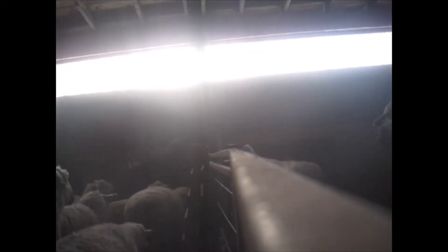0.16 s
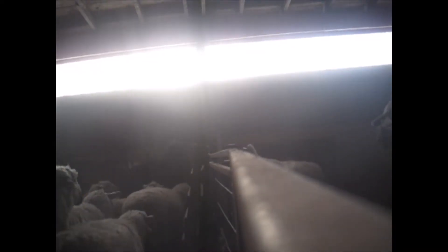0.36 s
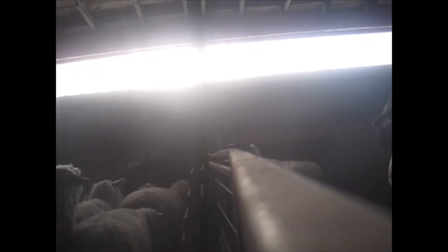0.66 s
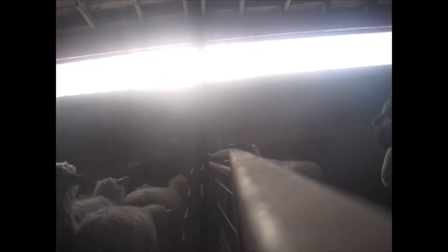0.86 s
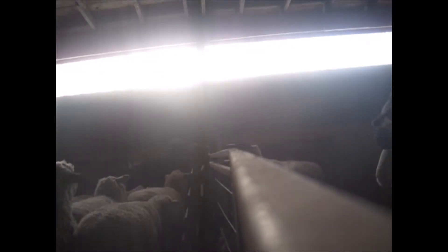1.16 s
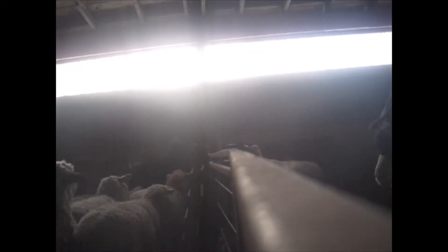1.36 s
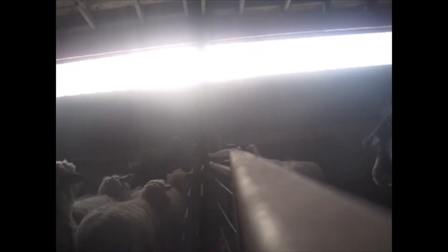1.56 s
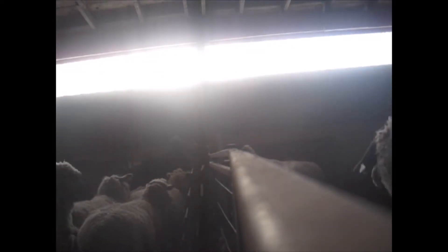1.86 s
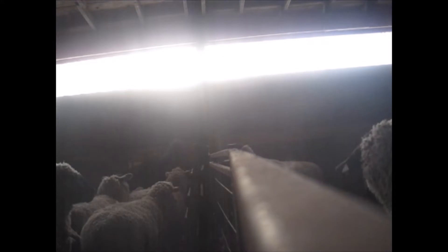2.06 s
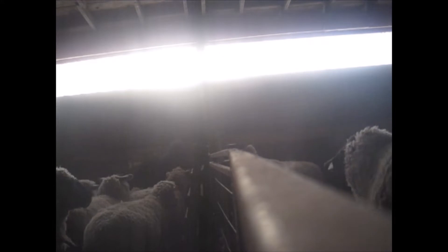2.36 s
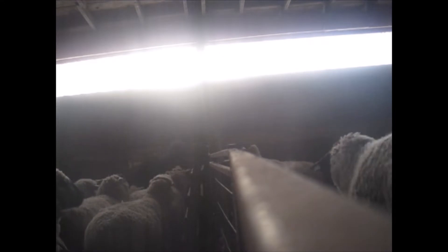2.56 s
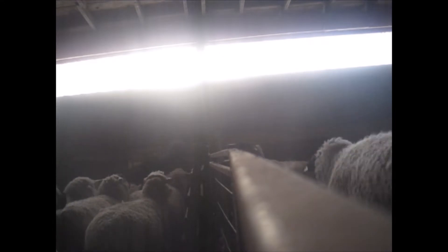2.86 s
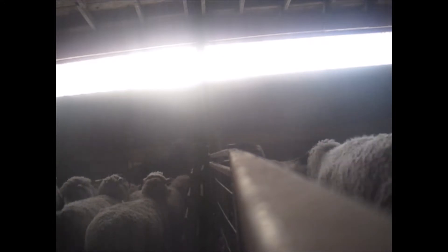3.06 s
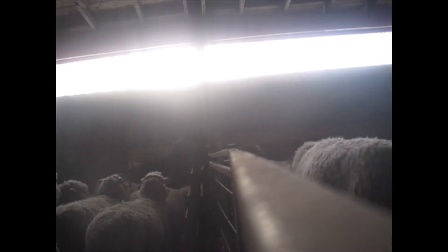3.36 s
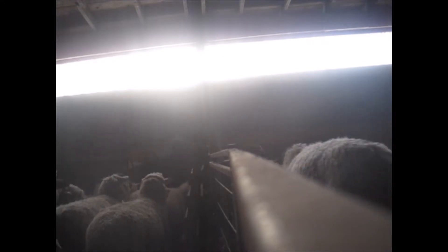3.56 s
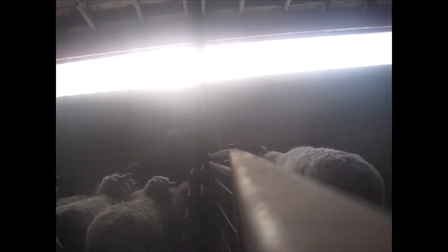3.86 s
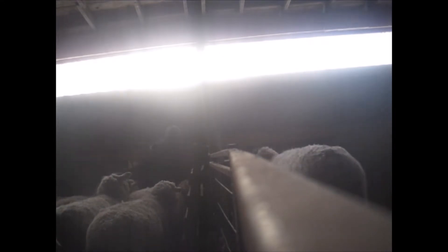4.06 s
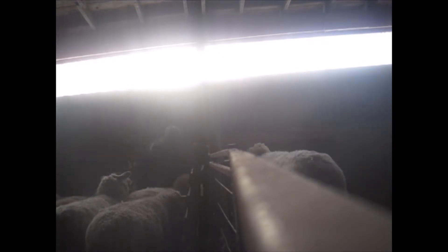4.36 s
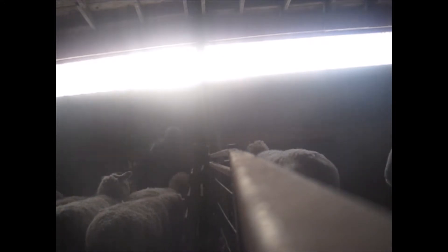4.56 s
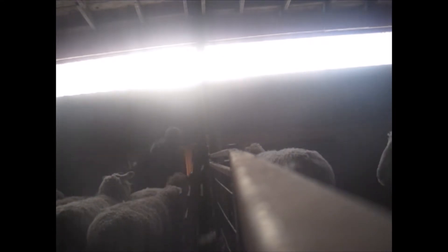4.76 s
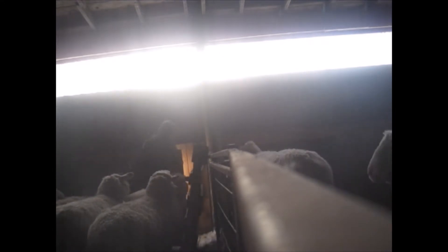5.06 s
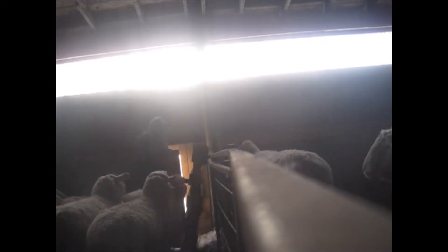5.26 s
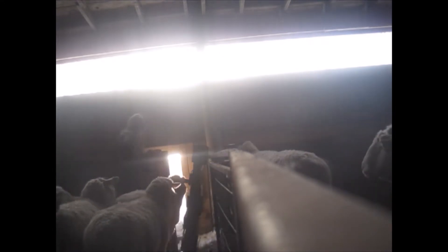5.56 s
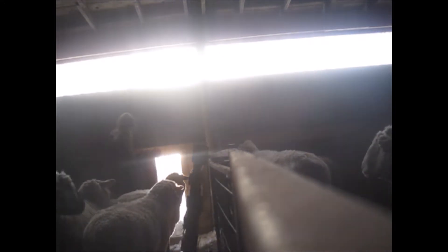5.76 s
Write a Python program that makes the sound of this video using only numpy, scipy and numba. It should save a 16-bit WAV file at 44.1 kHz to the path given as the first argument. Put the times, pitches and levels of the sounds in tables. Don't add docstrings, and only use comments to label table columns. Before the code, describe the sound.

A small camera microphone sits among penned sheep in a briefly echoing barn. A deep call is already ending; short closed-mouth grunts and bird chirps follow. A cough leads into a long, quavering higher bleat with a lower one beneath it. Then the voices stop, leaving thumps on boards, dry rustling and ticks, before a sharp metallic latch strike that rings, is damped, and leaves quiet bumps.

```python
import sys
import numpy as np
from scipy import signal
from scipy.fft import rfft, irfft
from scipy.io import wavfile
from scipy.ndimage import uniform_filter1d
from numba import njit

SR = 44100
rng = np.random.default_rng(int(sys.argv[2]) if len(sys.argv) > 2 else 0)


def wav_record(signal):
    frames = np.transpose(np.atleast_2d(signal))
    bounded = np.clip(frames, -1, 1)
    quanta = np.round(bounded * 32767).astype(np.int16)
    wavfile.write(sys.argv[1], SR, quanta)


def decibels_to_gain(level_db):
    exponent = np.asarray(level_db, float) / 20
    return 10 ** exponent


N = 260631
T = np.arange(N) / SR
LATCH_S = 5.181

# (frequency [Hz], density [dB per Hz])
RUSTLE_COLOUR = [(530, -14), (900, -4), (1040, -7.5), (1370, -2), (1840, -7), (2170, 0.5), (3180, -3),
                 (4230, -4), (12700, -24), (15500, -41)]


def rms_one(x):
    return x / np.sqrt(np.mean(x ** 2) + 1e-20)


def at_hz(points, hz):
    table_hz, values = np.array(points).T
    return np.interp(np.log(hz + 1), np.log(table_hz), values)


def over_time(rows, column):
    table = np.array(rows)
    return np.interp(T, table[:, 0], table[:, column])


def level(rows, column=1):
    s, db = np.array(rows)[:, 0], np.array(rows)[:, column]
    return decibels_to_gain(np.interp(T, np.r_[s[0] - .012, s, s[-1] + .02], np.r_[-90, db, -90]))


def drift(rate):
    r = np.exp(-2 * np.pi * rate / SR)
    return rms_one(signal.lfilter([1], [1, -2 * r, r * r], rng.standard_normal(N + SR))[SR:])


def coloured(x, spectrum):
    return rms_one(irfft(rfft(x) * decibels_to_gain(at_hz(spectrum, np.fft.rfftfreq(N, 1 / SR))), N))


def grains(per_s, spread_db):
    sizes = decibels_to_gain(spread_db * np.minimum(rng.exponential(1, N), 4)) * rng.standard_normal(N)
    return sizes * (rng.random(N) < per_s / SR)


def ring(x, hz, t60):
    r, w = decibels_to_gain(-60 / (t60 * SR)), 2 * np.pi * hz / SR
    return signal.lfilter([0, np.sin(w)], [1, -2 * r * np.cos(w), r * r], x + 1e-18)


@njit
def resonate(x, hz, width):
    y, r = np.zeros(len(x)), np.exp(-np.pi * width / SR)
    for i in range(2, len(x)):
        push = (1 - r * r) / 2 * (x[i] - x[i - 2])
        y[i] = push + 2 * r * np.cos(2 * np.pi * hz[i] / SR) * y[i - 1] - r * r * y[i - 2]
    return y


def glottis(hz, rough, sub, jitter, tremor, shake):
    wobble = np.convolve(shake, np.hanning(2000) / 600, "same")
    sub = np.clip(sub * (1 + .4 * drift(18)), 0, .95)
    unsteady = jitter * rough * drift(70) + tremor * rough * shake + .007 * np.roll(wobble, 30000)
    cycles = np.cumsum(hz * (1 + unsteady)) / SR + .98
    count = np.floor(cycles).astype(int)
    at = np.flatnonzero(np.diff(count)) + 1
    late = (cycles[at] % 1) / (cycles[at] - cycles[at - 1])
    chance = np.clip(rng.standard_normal(N), -2, 1.3)[count[at]]
    size = (1 - sub[at] * (count[at] % 2)) * decibels_to_gain(8 * rough[at] * chance)
    source = np.zeros(N)
    source[at - 1], source[at] = size * late, size * (1 - late)
    return source + .13 * rough * rng.standard_normal(N) * np.exp(-2.5 * (cycles % 1))


def bleat(rows, hoarse, throat, jitter, tremor):
    hz, mouth_hz = over_time(rows, 1), over_time(rows, 3)
    rough, sub = over_time(hoarse, 1), over_time(hoarse, 2)
    shake = drift(30.14)
    source = glottis(hz, rough, sub, jitter, tremor, shake)
    voice, wander, shimmer = 0, drift(4.0), drift(25.2)
    for k, (f_hz, width, db) in enumerate(throat):
        centre = mouth_hz if k == 0 else f_hz * (1 + 0.013 * np.roll(wander, 20000 * k))
        twice = resonate(resonate(source, centre, float(width)), centre, float(width))
        swelling = 2.6 * np.roll(shimmer, 9000 * k)
        voice = voice + decibels_to_gain(db + swelling) * twice
    even = voice / np.sqrt(uniform_filter1d(voice ** 2, size=2600) + 1e-12)
    return level(rows, column=2) * even * decibels_to_gain((.8 + 3 * rough) * shake)


def chest_tone(rows, levels):
    hz = over_time(rows, 1) * (1 + .015 * drift(12))
    return level(levels) * decibels_to_gain(2.5 * drift(23)) * np.sin(2 * np.pi * np.cumsum(hz) / SR)


def ewe():
    # (time [s], pitch [Hz], level [dB], mouth resonance [Hz])
    call = [
        (0.0, 145.1, -14, 650),
        (0.07, 141.9, -16, 630),
        (0.3, 136.4, -14.5, 655),
        (0.35, 135, -13, 676),
        (0.454, 125.6, -16.5, 624),
        (0.495, 124.5, -18.5, 568),
        (0.505, 130, -30, 682),
        (0.6, 127.8, -28, 650),
    ]
    # (time [s], roughness [0-1], strong-weak share [0-1])
    hoarse = [(0, .03, 0), (.13, .04, 0), (.2, .17, .08), (.33, .06, 0), (.45, .12, .05), (.5, .4, .3),
              (.53, .9, .4)]
    throat = [(650, 78, 7.5), (352, 106, -8.5), (1150, 890, -7), (1950, 235, -3.5), (2178, 290, -2),
              (2680, 100, -7), (3300, 480, -15.5), (3870, 660, -13.5), (4400, 100, -14.5), (4866, 150, -12),
              (6240, 280, -26.5), (7500, 750, -31.5), (9400, 220, -33), (10360, 400, -36.5)]
    # (time [s], level [dB])
    chest = [(0.0, -35), (.12, -38.5), (.19, -47)]
    return bleat(call, hoarse, throat, 0.0407, 0.055), chest_tone(call, chest)


def shoving(shoves, peaks_db, swell, drop, after_db, settle):
    gain = 0
    for (s, hold), db in zip(np.array(shoves)[:, :2], peaks_db):
        since = np.maximum(T - s - hold, 0)
        fading = decibels_to_gain(-drop * since) + decibels_to_gain(after_db - settle * since)
        gain = gain + decibels_to_gain(db - swell * np.maximum(s - T, 0)) * fading
    return gain


def jostling():
    # (time [s], hold [s], rustle [dB], boards [dB], rail [dB])
    shoves = [(0.006, 0.048, -60, -60, -41), (0.537, 0.042, -39, -28, -48), (1.085, 0.33, -44, -40.5, -48),
              (1.818, 0.25, -35.5, -37, -48), (2.293, 0.16, -55, -67, -44), (3.116, 0.057, -26, -50, -70),
              (3.19, .01, -30, -14, -67), (3.357, .06, -37, -36.5, -60), (3.287, 0.018, -21.5, -11.5, -30),
              (3.637, 0.058, -60, -44.5, -78), (4.027, 0.092, -39.5, -46, -58), (4.2, 0.033, -38, -50, -50),
              (4.302, 0.009, -35.5, -36, -62), (4.62, 0.055, -17.5, -18, -41), (4.876, 0.33, -38, -39, -91),
              (5.224, 0.11, -26, -63, -76), (5.271, 0.09, -32.5, -33.5, -76),
              (5.769, 0.1, -38.5, -35.5, -57)]
    # (frequency [Hz], density [dB per Hz])
    board_colour = [(59, -71), (100, -27), (192, -1.5), (245, 0.5), (376, 1.5), (934, -0.5), (2360, -24),
                    (3000, -18), (3900, -58), (6600, -120)]
    rustle = coloured(grains(12000, 0.8) * decibels_to_gain(2.4 * drift(25)), RUSTLE_COLOUR)
    boards = coloured(grains(2500, 0.97) * decibels_to_gain(0.32 * drift(8.2)), board_colour)
    rail_band = signal.butter(2, [35, 150], "band", fs=SR, output="sos")
    rail = rms_one(signal.sosfilt(rail_band, rng.standard_normal(N)))
    rustle_db, boards_db, rail_db = np.transpose(shoves)[2:]
    out = shoving(shoves, rustle_db, swell=685, drop=356, after_db=-22.5, settle=34) * rustle
    out += shoving(shoves, boards_db, swell=608, drop=279, after_db=-15.5, settle=58.5) * boards
    return out + shoving(shoves, rail_db, swell=188, drop=81, after_db=-21, settle=9) * rail


def sparrows():
    # (time [s], length [s], start [Hz], end [Hz], level [dB])
    rising = [(0.713, 0.0215, 3174, 4360, -19.5), (0.775, 0.027, 3070, 4180, -16),
              (0.782, 0.068, 5200, 6130, -29.5), (1.329, 0.037, 3200, 3916, -19.5),
              (1.724, 0.068, 2812, 4260, -16.5), (3.126, 0.041, 2910, 5638, -26.5),
              (3.574, 0.039, 2190, 3110, -27), (3.701, 0.048, 2400, 3010, -30.5),
              (3.904, 0.037, 2400, 3130, -35.5), (4.0, 0.05, 3900, 4900, -25.5),
              (4.009, 0.045, 2600, 3687, -21.5), (4.272, 0.031, 3770, 4270, -31)]
    falling = [(3.42, .055, 5100, 4100, -26), (4.05, .05, 5420, 2200, -26), (1.3, .05, 5100, 4800, -27),
               (0.549, 0.04, 4260, 3330, -27.5), (0.742, 0.027, 4000, 2840, -24.5),
               (0.801, 0.034, 3300, 2680, -23), (0.844, 0.051, 6000, 4706, -24.5),
               (.9, 0.038, 6020, 4750, -31.5), (1.041, 0.036, 2540, 2260, -33.5),
               (1.235, 0.035, 4420, 3340, -28), (1.262, 0.055, 3160, 2294, -25.5),
               (2.465, .04, 3600, 3050, -29), (1.426, 0.044, 3890, 2766, -18),
               (1.605, 0.04, 4300, 2600, -27.5), (1.633, 0.053, 4270, 3500, -26),
               (1.651, 0.046, 3300, 2600, -24.5), (2.027, 0.066, 5614, 3830, -20),
               (2.09, 0.043, 4280, 3660, -23.5), (3.193, 0.041, 4730, 3603, -11),
               (3.252, 0.062, 4500, 2960, -21), (3.428, 0.075, 3794, 2605, -24),
               (3.53, 0.024, 4430, 2940, -21.5), (3.667, 0.03, 4500, 2770, -24.5),
               (3.47, .04, 3700, 2600, -31), (4.034, 0.049, 4730, 3400, -19),
               (4.076, 0.042, 3930, 2780, -18), (4.861, 0.063, 3030, 2112, -32.5)]
    hums = [
        (0.501, 0.076, 255, 246, -32.5),
        (2.002, 0.068, 152, 158, -36),
        (2.096, 0.052, 162, 266, -22),
        (3.199, 0.1125, 950, 1100, -19),
        (3.34, 0.045, 1070, 1058, -30),
    ]
    # (time [s], length [s], top [Hz], level [dB])
    arched = [
        (1.008, 0.056, 4760, -34.5),
        (3.201, 0.037, 2250, -18.5),
        (3.43, 0.0613, 1810, -29),
        (3.984, 0.05, 6490, -36),
        (4.293, 0.057, 2943, -31),
    ]
    # (time [s], length [s], pitch [Hz], level [dB])
    steady = [(0.454, 0.038, 2780, -19.5), (0.468, 0.036, 5500, -23.5), (0.737, 0.037, 4400, -20),
              (1.578, 0.059, 5900, -46), (1.644, 0.022, 6300, -38), (1.677, 0.037, 4650, -22),
              (1.68, 0.036, 5040, -34), (2.394, 0.034, 4130, -28.5), (2.417, 0.016, 3700, -26),
              (2.515, 0.023, 3450, -43), (2.511, 0.021, 5300, -40), (2.621, 0.048, 3430, -32),
              (2.638, 0.022, 3870, -41), (2.735, 0.043, 5420, -35), (2.798, 0.037, 3700, -37),
              (2.785, 0.058, 4300, -36), (2.827, .04, 5300, -39.5), (3.163, 0.026, 5500, -20),
              (3.503, 0.037, 4490, -27.5), (3.64, 0.039, 4460, -28.5), (3.598, 0.027, 2940, -28.5),
              (3.739, 0.031, 2990, -40), (4.303, 0.045, 1400, -35), (5.24, 0.025, 3750, -29),
              (5.45, 0.025, 4950, -58)]
    rise_bend, fall_bend = 1.05, 0.93
    arch_ends, octave = 0.91, .05
    flutter = decibels_to_gain(3.13 * drift(500) + 3.7 * drift(70)) + 0.15 * drift(2500)
    burr = .011 * np.sin(2 * np.pi * 110 * T + 3 * drift(20))
    waver = 1 + .016 * drift(90) + .016 * drift(500) + burr
    notes = [(s, d, a, rise_bend * np.sqrt(a * b), b, db) for s, d, a, b, db in rising + hums]
    notes += [(s, d, a, fall_bend * np.sqrt(a * b), b, db) for s, d, a, b, db in falling]
    notes += [(s, d, arch_ends * top, top, arch_ends * top, db) for s, d, top, db in arched]
    notes += [(s, d, 1.015 * hz, 1.01 * hz, .97 * hz, db) for s, d, hz, db in steady]
    out = np.zeros(N)
    for s, length, start_hz, turn_hz, end_hz, db in notes:
        i, n = int((s - .006) * SR), int(length * SR)
        u = np.arange(n) / n
        hz = np.interp(u, [0, .5, 1], [start_hz, turn_hz, end_hz]) * waver[i:i + n]
        phase = 2 * np.pi * np.cumsum(hz) / SR
        swell = np.sin(np.pi * u) ** .55
        whistle = np.sin(phase) + octave * np.sin(2 * phase)
        out[i:i + n] += decibels_to_gain(db + 2.5) * swell * flutter[i:i + n] * whistle
    return out


def blows():
    # (time [s], peak [dB], mode [Hz])
    knocks = [(0.555, -14, 600), (0.606, -14, 794), (0.972, -17.5, 864), (0.974, -17.5, 475),
              (1.287, -11.5, 600), (3.184, -6, 650), (3.273, -26, 1042), (3.642, -22, 430),
              (4.641, -23, 384), (4.297, -40, 700), (4.345, -33, 293), (5.649, -35, 846), (5.769, -24, 980),
              (5.785, -22.5, 1164)]
    # (time [s], peak [dB])
    ticks = [(.974, -24), (1.829, -21), (1.846, -25), (2.402, -21), (3.281, -9), (3.3027, -5.5),
             (3.308, -10), (3.312, -11.5), (3.318, -30), (3.589, -16.5), (3.595, -18.5), (3.694, -13),
             (3.725, -12.5), (4.343, -11), (4.5841, -7.5), (4.609, -10.5), (4.616, -8.5), (4.6417, -5.5),
             (4.647, -15), (4.675, -4.5), (4.866, -18.5), (4.9235, -18), (5.101, -17), (5.118, -19),
             (5.136, -35), (5.179, 2.5), (5.2993, -5.5), (5.306, -9), (5.3392, -13), (5.3464, -12),
             (5.7666, -21)]
    tick_t60_s = 0.041
    out, crack = np.zeros(N), coloured(rng.standard_normal(N), RUSTLE_COLOUR)
    for s, db, hz in knocks:
        i, push = int((s - .003) * SR), np.zeros(5000)
        push[:700] = np.hanning(700) * np.sin(2 * np.pi * hz * T[:700]) / 175
        board = ring(push, hz, 0.035) + .6 * ring(push, 1.27 * hz, 0.05) + .5 * ring(push, 0.74 * hz, 0.06)
        out[i:i + 5000] += decibels_to_gain(db + 4.5) * board
    for s, db in ticks:
        age = np.maximum(T - s + 0.0013, 0)
        attack = np.minimum(age / 0.0026, 1) ** 1.56
        out += decibels_to_gain(db - 11.0) * crack * attack * decibels_to_gain(-60 * np.maximum(age - .003, 0) / tick_t60_s)
    return out


def grunts():
    # (time [s], hold [s], pitch [Hz], peak [dB])
    pushes = [
        (0.981, 0.0044, 217, -23),
        (1.064, 0.012, 233.3, -20.5),
        (1.108, 0.0096, 236, -15),
        (1.33, 0.0064, 236.4, -12.5),
        (1.355, 0.03, 239.9, -12.5),
        (1.432, 0.027, 245.6, -22.5),
    ]
    # (time [s], roughness [0-1], strong-weak share [0-1])
    hoarse = [(.95, .3, .1), (1.06, .12, 0), (1.1, .55, .2), (1.3, .4, .15), (1.36, .25, .1),
              (1.42, .3, .1), (1.5, .4, .1)]
    throat = [(650, 170, 7), (281, 54, 1.5), (463, 130, -1.5), (950, 300, -3.5), (1430, 360, -5.5),
              (2400, 270, -5), (3300, 640, -9.5), (4540, 490, -17)]
    attack_s, release_s, rise, mouth_hz = 0.025, 0.033, 1.02, 578
    out = 0
    for s, hold, hz, db in pushes:
        rows = [(s - attack_s, hz, db - 11, mouth_hz), (s, hz, db, mouth_hz),
                (s + hold, hz * rise, db - 4.0, mouth_hz),
                (s + hold + release_s, hz * rise, db - 24.0, mouth_hz)]
        out = out + bleat(rows, hoarse, throat, 0.071, 0.0564)
    return out


def cough():
    # (time [s], pitch [Hz], level [dB], mouth resonance [Hz])
    call = [
        (1.832, 220, -23, 650),
        (1.846, 219, -17, 650),
        (1.885, 214, -16, 650),
        (1.925, 210, -17, 656),
        (1.945, 210, -27, 650),
        (2.1, 190, -27, 650),
        (2.15, 178, -21, 650),
    ]
    # (time [s], roughness [0-1], strong-weak share [0-1])
    hoarse = [(1.82, .6, .3), (2.14, .7, .3)]
    throat = [(700, 500, 7.5), (416, 360, -2.5), (1100, 1200, 1.5), (1910, 340, -3), (2600, 100, 3.5),
              (3300, 320, 2), (5200, 440, -28)]
    return bleat(call, hoarse, throat, .16, 0.052)


def ram():
    # (time [s], pitch [Hz], level [dB], mouth resonance [Hz])
    call = [
        (2.15, 214.4, -17, 660),
        (2.28, 212.3, -17, 720),
        (2.45, 203, -16.5, 674),
        (2.62, 221.8, -14.5, 700),
        (2.69, 221.6, -18, 843.6),
        (2.76, 218.3, -17, 680),
        (2.84, 214, -17, 720),
        (2.93, 198, -17.5, 740),
        (3.05, 178, -20.5, 700),
        (3.2, 165, -22.5, 652),
    ]
    # (time [s], roughness [0-1], strong-weak share [0-1])
    hoarse = [(2.14, .35, .2), (2.3, .36, .5), (2.5, .45, .6), (2.58, .3, .4), (2.63, .07, .05),
              (2.76, .08, .1), (2.84, .12, .15), (2.92, .22, .3), (3.05, .36, .6), (3.2, .4, .6)]
    throat = [(720, 164, 4.5), (411, 110, -7), (1110, 160, -7), (1493, 310, -0.5), (2143, 386, -2.5),
              (2694, 41, -5.5), (3500, 1500, -44), (5160, 490, -23.5), (7500, 750, -39)]
    # (time [s], level [dB])
    chest = [(2.24, -48), (2.321, -39.5), (2.6, -34), (2.78, -33), (2.89, -42), (2.94, -34), (3.02, -52)]
    return bleat(call, hoarse, throat, 0.0467, .08), chest_tone(call, chest)


def wether():
    # (time [s], pitch [Hz], level [dB], mouth resonance [Hz])
    call = [(2.155, 158.8, -11.5, 700), (2.2, 160.3, -14.5, 700), (2.27, 166.3, -21, 663),
            (2.33, 153.9, -19, 776), (2.42, 153, -19, 786), (2.5, 146.3, -26.5, 700), (2.6, 147, -24, 700),
            (2.69, 147.8, -23, 710), (2.74, 150.3, -17.5, 740), (2.88, 152.9, -18.5, 748),
            (2.98, 151.6, -20, 756), (3.04, 139.3, -15, 700), (3.12, 134.9, -17.5, 683),
            (3.17, 129.8, -27.5, 644)]
    # (time [s], roughness [0-1], strong-weak share [0-1])
    hoarse = [(2.13, .12, .05), (2.27, .18, .1), (2.35, .16, .15), (2.5, .35, .3), (2.7, .18, .1),
              (2.8, .22, .2), (2.97, .1, .1), (3.05, .14, .3), (3.2, .25, .3)]
    throat = [(720, 162, 6.5), (600, 31, 0), (352, 31, -6.5), (488, 52, -4.5), (983, 410, -8.5),
              (1530, 420, -4), (2143, 490, -7.5), (2783, 84, -10.5)]
    return bleat(call, hoarse, throat, 0.0488, .07)


def latch():
    # (frequency [Hz], level [dB], t60 [s])
    bar_modes = [(1485, -2, .7), (1503, -2, .7), (2250, 14, .07), (2480, -8, .5), (2610, 24, .03),
                 (2790, 21, .07), (4280, 4, .09), (4745, 2, 1.2), (6597, -6, 3.9), (7171, -6, 3.8),
                 (9600, -9, .4), (11000, -12, .35), (12300, -24, .3), (13700, -28, .3), (15300, -28, .3)]
    hits = np.zeros(N)
    hits[(SR * (LATCH_S + np.array([-.003, 0, .003]))).astype(int)] = .5, .7, 1
    last_hit = hits * (T > LATCH_S + .001)
    modes = sum(decibels_to_gain(db - 26.5) * ring(last_hit, hz, t60) for hz, db, t60 in bar_modes)
    contact = signal.lfilter([.25, 0, -.25], [1, -1.5, .7], hits)
    clank = decibels_to_gain(-10.0) * ring(contact, 2330, 0.023)
    slide = np.clip((T - LATCH_S + 0.028) / 0.023, 0, 1)
    squeak_hz = 5200 - 1100 * slide + 120 * drift(180)
    squeak_gain = decibels_to_gain(-17.5 + 2.4 * drift(210)) * (0.38 + 0.87 * slide) * np.sin(np.pi * slide) ** 0.17
    squeak = squeak_gain * np.sin(2 * np.pi * np.cumsum(squeak_hz) / SR)
    touched = np.maximum(T - 5.296, 0)
    damped = np.maximum(decibels_to_gain(-900 * touched), .2 * decibels_to_gain(-60 * touched))
    high_pass = signal.butter(2, 600, "high", fs=SR, output="sos")
    return signal.sosfilt(high_pass, modes * damped + clank + squeak)


def nearby(x):
    for lag in (37, 83, 149):
        b = np.r_[-.55, np.zeros(lag - 1), 1]
        x = signal.lfilter(b, b[::-1], x + 1e-18)
    return x


def barn(x):
    # (frequency [Hz], t60 [s])
    barn_t60 = [(200, 0.48), (1500, 0.33), (5000, 0.32), (14000, 0.16)]
    t, tail = T[:SR // 2], 0
    for low in 100 * 2.0 ** np.arange(8):
        octave_band = signal.butter(2, [low, min(2 * low, 20000)], "band", fs=SR, output="sos")
        band = signal.sosfilt(octave_band, rng.standard_normal(len(t)))
        tail = tail + band * decibels_to_gain(-60 * t / at_hz(barn_t60, 1.53 * low)) * np.clip(t / 0.0055, 0, 1)
    return signal.fftconvolve(x, tail / np.sqrt(np.sum(tail ** 2)))[:N]


def noise_floor():
    # (frequency [Hz], density [dB per Hz])
    floor_colour = [(12, -51), (20, -51), (129, 3.5), (176, 4.5), (632, 3), (1770, -3.5), (2690, -5),
                    (7760, -10.5), (9960, -15), (15600, -27)]
    return decibels_to_gain(-40) * coloured(rng.standard_normal(N), floor_colour) * decibels_to_gain(1.3 * drift(8.6))


def scene():
    ewe_voice, ewe_chest = ewe()
    ram_voice, ram_chest = ram()
    sheep = nearby(ewe_voice + ram_voice + wether() + grunts() + cough())
    birds, hits, metal = nearby(sparrows()), blows(), latch()
    echo = barn(decibels_to_gain(-7.0) * sheep + decibels_to_gain(-6.0) * birds + decibels_to_gain(-11.5) * hits + decibels_to_gain(-19) * metal)
    near = decibels_to_gain(-1.5) * sheep + decibels_to_gain(-6.0) * birds + hits + echo
    duck = 1 / (1 + 9 * np.sqrt(uniform_filter1d(near ** 2, size=4000)))
    gap = 1 - .93 * np.exp(-((T - LATCH_S - .016) / .011) ** 4)
    pen = near + duck ** 0.84 * jostling() + duck * noise_floor()
    return (metal + gap * pen + ram_chest + ewe_chest)[None]


def treble_losses(x):
    losses = [.206, 0.355, .482, 0.631, 0.823, 1.058, 1.271, 1.336, 1.465, 1.74, 2.23, 2.445, 2.532, 2.593,
              2.642, 2.646, 2.655, 2.699, 2.742, 2.806, 2.851, 3.98, 4.043, 5.07, 5.453]
    deep_losses = [.206, 1.058, 2.23, 5.07, 5.453]
    lost_above_hz, deep_above_hz = 6600, 5500
    kept_within_db, stands_out_db = -22.5, 9
    fade, hz = np.hanning(1024), np.fft.rfftfreq(1024, 1 / SR)
    patch = np.minimum(1, 1.8 * fade ** 2.5) / np.maximum(fade, .3) * .93
    for s in losses:
        i = int(s * SR) - 512
        bins = rfft(x[i:i + 1024] * fade)
        size = np.abs(bins)
        peaks = size > decibels_to_gain(stands_out_db) * uniform_filter1d(size, size=31)
        tonal = uniform_filter1d(1. * peaks, size=3) > 0
        weak = (size < decibels_to_gain(kept_within_db) * size.max()) & ~tonal
        weak = weak | (hz > lost_above_hz) | ((hz > deep_above_hz) & ~tonal & (s in deep_losses))
        x[i:i + 1024] -= irfft(bins * weak) * patch
    return x


def band_limit(x):
    return signal.sosfilt(signal.butter(12, 15710, fs=SR, output="sos"), x)


def record(dry):
    x = treble_losses(1.02 * np.tanh(dry[0] / 1.02))
    x = signal.sosfilt(signal.butter(8, [26, 17500], "band", fs=SR, output="sos"), x)
    x = signal.sosfilt(signal.cheby2(14, 60, 16150, fs=SR, output="sos"), x)
    return band_limit(x[None])


dry = scene()
out = record(dry)
wav_record(out)
```